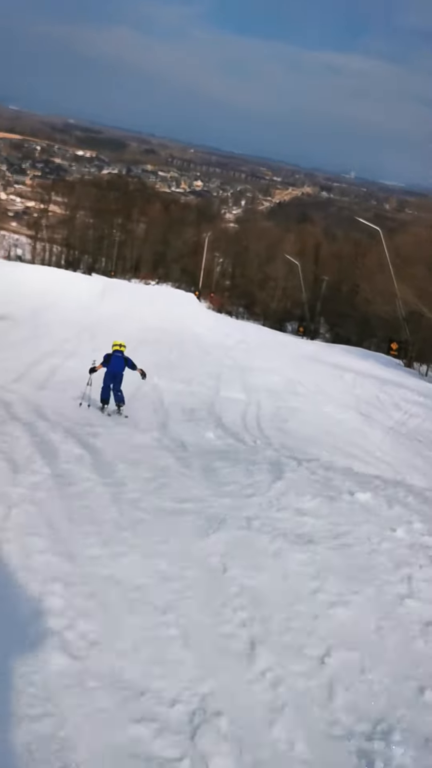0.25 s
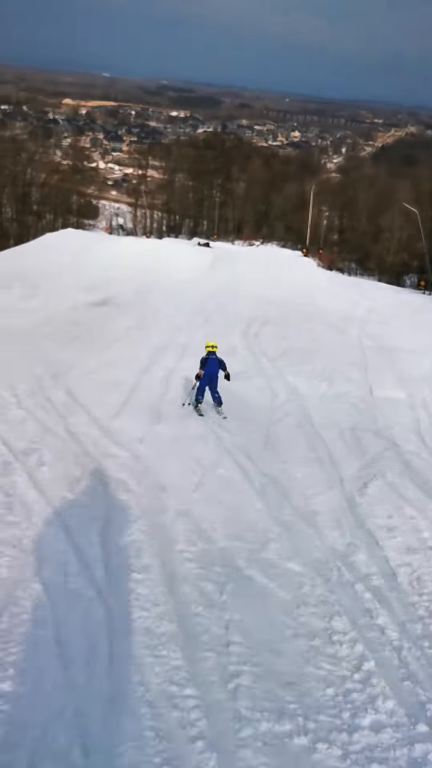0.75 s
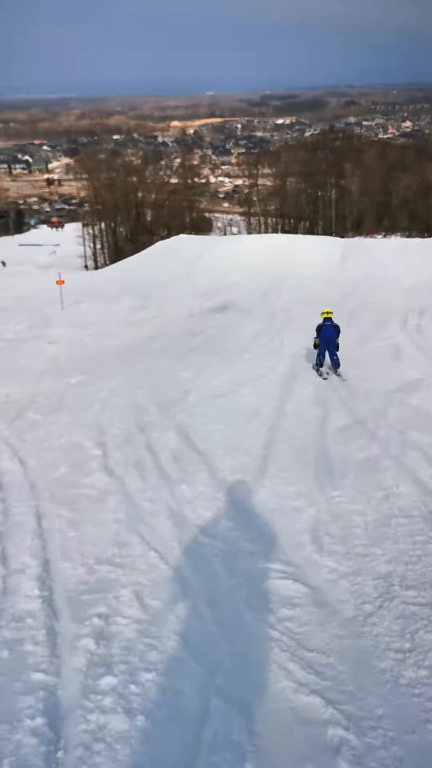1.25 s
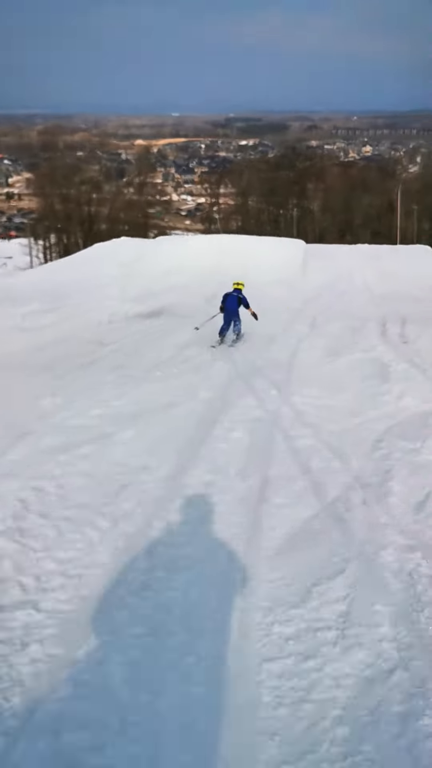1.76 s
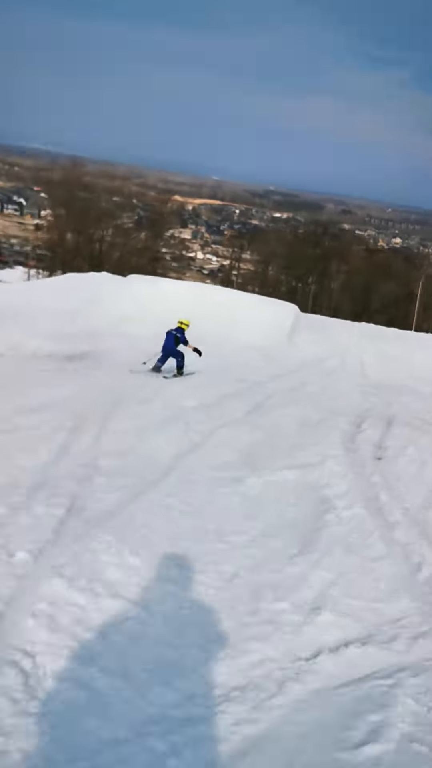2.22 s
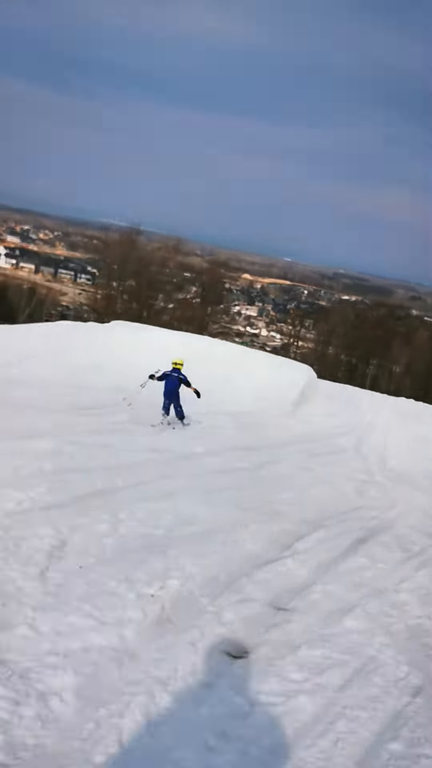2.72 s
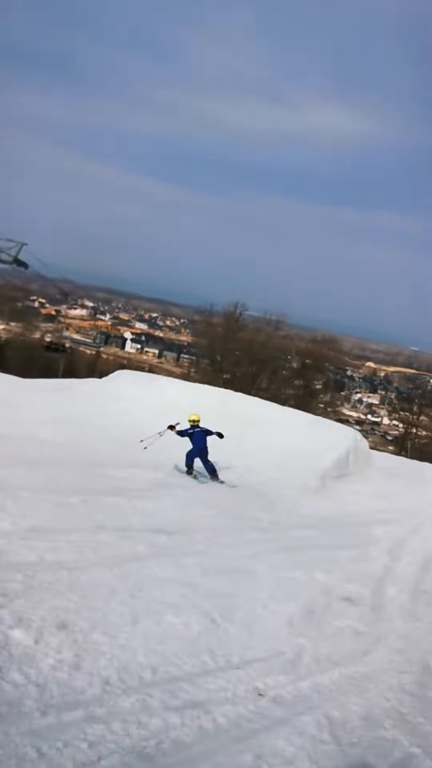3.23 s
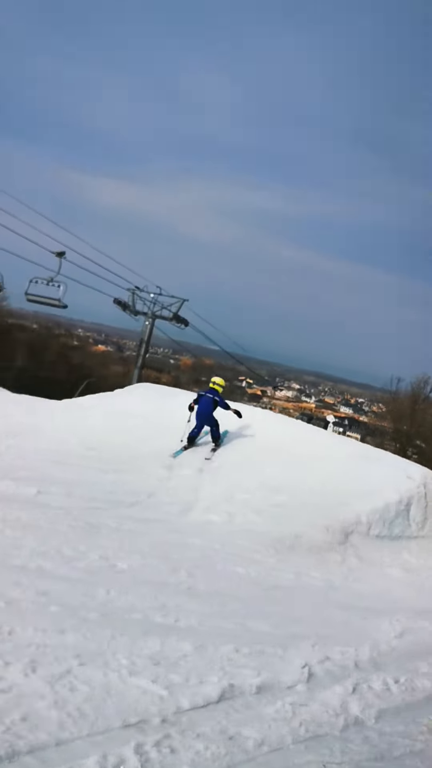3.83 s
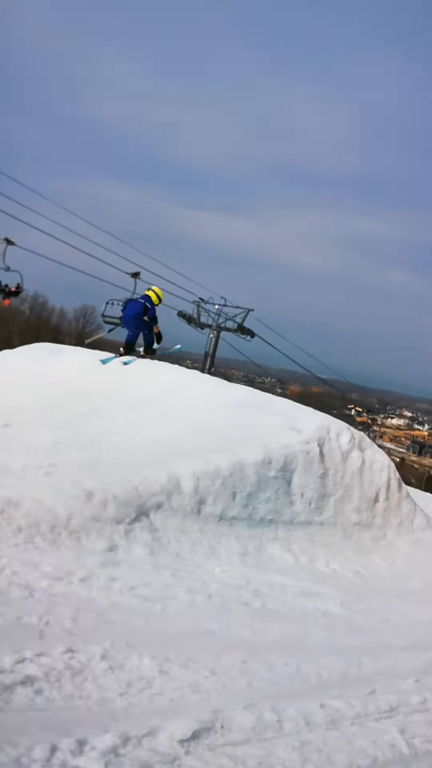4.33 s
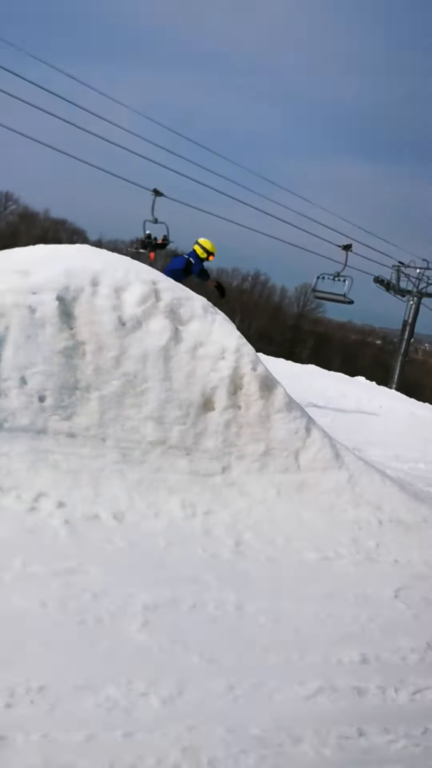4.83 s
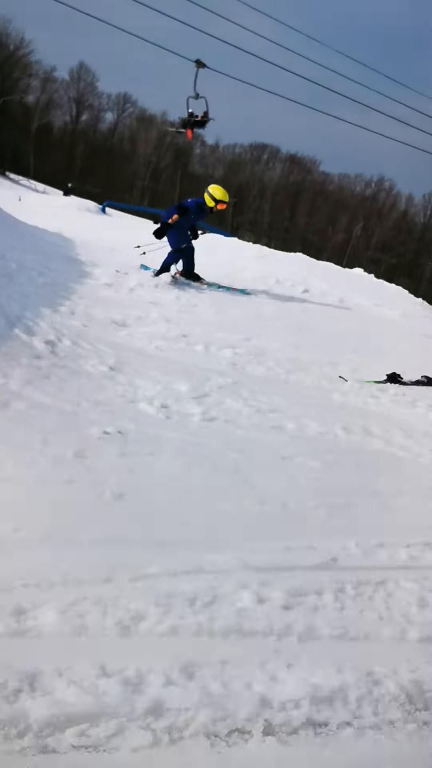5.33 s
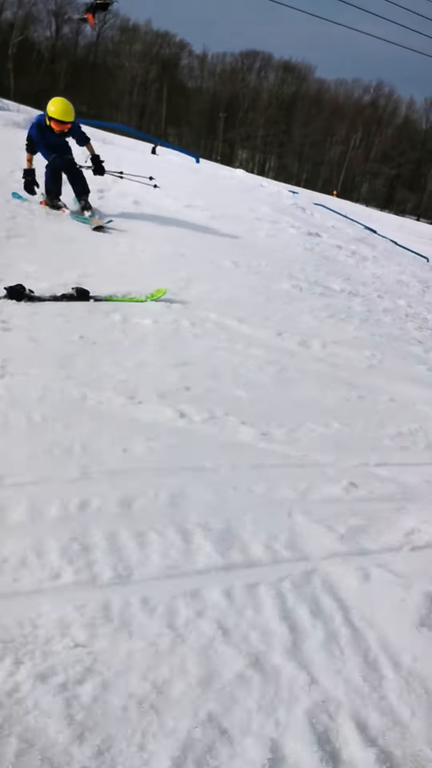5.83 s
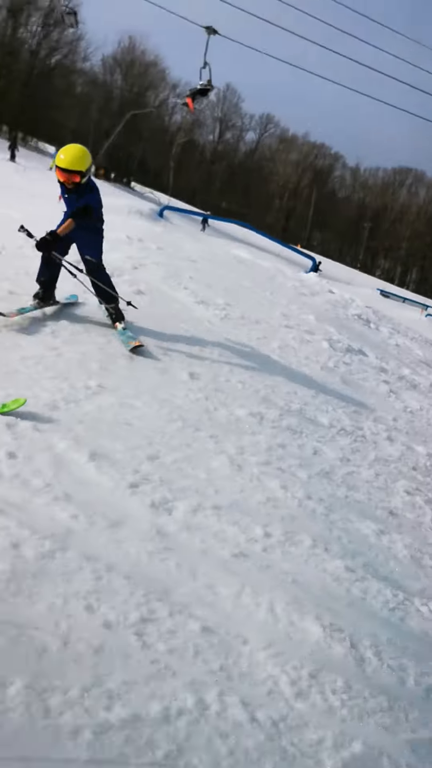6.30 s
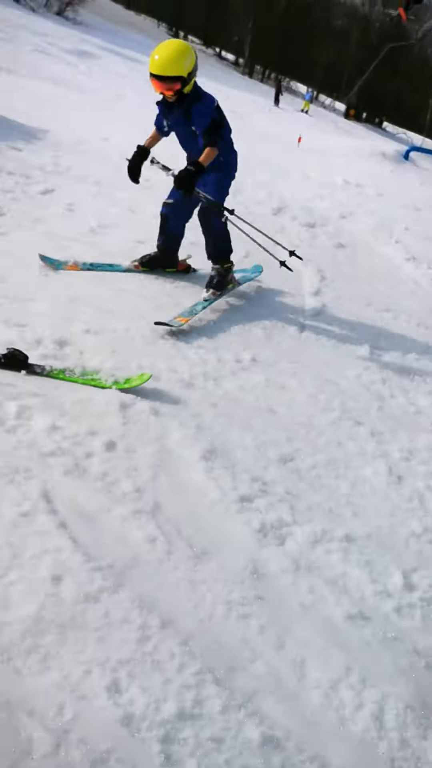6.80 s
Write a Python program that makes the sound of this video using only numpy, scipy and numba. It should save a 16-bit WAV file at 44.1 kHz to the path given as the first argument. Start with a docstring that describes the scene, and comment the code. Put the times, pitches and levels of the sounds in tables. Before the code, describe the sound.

Outdoors on a ski slope, a handheld microphone moves downhill. From 0 s, skis hiss and scrape over crusty snow, with gritty crunches and small ringing knocks, brightest toward the right, while a low puff of wind opens the scene. Around 0.7 s there is a short knock and the spray thins. From about 1 s wind buffets harder, rumbling and fluttering differently on each side, with blunt thumps; the right is more exposed. Between 1.5 and 4.5 s the ski hiss swells and dips beneath rolling gusts. From 4.6 to 5.8 s the wind turns roughest, with rapid heavy slaps close to overload. It then falls away, exposing coarse scraping and lower crunching. A braking skid swells near 6.5 s with a sharp knock, stops abruptly by 6.8 s, and leaves faint hiss and tiny low bumps until about 7 s.

```python
"""A phone is carried downhill on skis. From the start edges scrape, snow sprays and crust crunches below: shaped
noise with ringing knocks, nearer the right port. Wind buffets each microphone port on its own: noise through
moving low-passes, brighter in faster gusts; from about 1 s single eddies also land as damped blows.
The blows end before 6 s and the wind dies away; a braking skid swells near 6.6 s, then the skis fade too."""
import sys
import numpy as np
from scipy import signal
from scipy.fft import rfft, irfft, next_fast_len
from scipy.io import wavfile
from scipy.ndimage import uniform_filter1d
from numba import njit

SR = 44100
rng = np.random.default_rng(int(sys.argv[2]) if len(sys.argv) > 2 else 0)


def store_pcm(level_fs):
    """Save levels as 16-bit WAV."""
    pcm = np.round(np.clip(level_fs, -1, 1) * 32767).astype(np.int16)
    wavfile.write(sys.argv[1], SR, np.atleast_2d(pcm).T)


N = 311346

# Skis, before port gains: (time [s], edge scrape [dB], snow spray [dB])
SKI_LEVELS = [(0, -37.5, -29.5), (.3, -40, -32), (.55, -36.5, -30), (1.1, -46.5, -35.5), (1.65, -35.5, -28),
              (2.15, -37, -29), (2.45, -39, -31.5), (2.9, -43, -30), (3.1, -35.5, -29), (3.7, -35.5, -28.5),
              (4.25, -39, -31), (4.52, -38, -27.5), (4.95, -40.5, -32), (5.1, -46.5, -32),
              (5.42, -42.5, -32), (5.62, -31.5, -30.5), (5.78, -36, -28.5), (5.95, -33.5, -28),
              (6.12, -34.5, -28), (6.38, -30.5, -27.5), (6.66, -29.5, -30.5), (6.72, -44.5, -32),
              (6.8, -53, -39), (6.9, -50, -40.5), (6.97, -49, -39.5), (7.06, -52, -49)]
# Scrape spectrum, relative: (frequency [Hz], density [dB per Hz])
SCRAPE_SPECTRUM = [(150, -4), (450, 0), (900, 2), (1800, -6.5), (3500, -7.5), (5000, 1.5), (8500, -4),
                   (10000, -8), (15000, -6.5)]
# Spray spectrum, relative: (frequency [Hz], density [dB per Hz])
SPRAY_SPECTRUM = [(1000, -33), (3000, -23), (6500, -9), (10000, -5), (13000, 4.5), (15500, -1.35)]
# Scrape noise common to both ports and each port's own: (frequency [Hz], gain [dB])
SHARED_SCRAPE_EQ = [(500, -0.5), (1200, 2.5), (3000, 1.0), (5000, -9.0), (9000, -29)]
OWN_SCRAPE_EQ = [(500, -10.5), (1200, -5.5), (3000, 4.5), (5000, -5.0), (9000, 1.8)]
# Crusty snow crunching under the edges: (time [s], level [dB], centre before wander [Hz])
CRUNCH_BURSTS = [(0, -48, 2330), (.24, -45, 2300), (.33, -53, 2400), (.4, -43, 2280), (.56, -43, 2230),
                 (.62, -55, 2200), (.72, -82, 2250), (1.1, -59, 2280), (1.6, -45, 2280), (2.1, -46, 2250),
                 (2.3, -61, 2230), (3.2, -50, 2240), (4.5, -53, 2130), (5.3, -58, 2700), (5.52, -45, 2800),
                 (5.68, -44, 2750), (5.78, -60, 2400), (5.9, -49, 1500), (5.98, -46, 1100),
                 (6.08, -44, 1100), (6.16, -49, 1300), (6.27, -43, 1050), (6.36, -47, 900),
                 (6.45, -42, 800), (6.51, -49, 900), (6.56, -44, 1100), (6.65, -41, 850), (6.72, -56, 800),
                 (6.92, -58, 700), (7.06, -51, 895)]
# Left port response to the skis: (frequency [Hz], gain [dB])
LEFT_PORT_EQ = [(300, -2.5), (5000, -0.5), (9000, 0), (10500, -3), (14300, -2.5), (15000, -7), (15700, -6)]
# Right port cavity modes: (frequency [Hz], width [Hz], gain [dB])
RIGHT_PORT_MODES = [(5510, 1000, 4.5), (6890, 630, 8.5), (9450, 1540, 4), (10770, 1150, 8),
                    (13300, 1100, -0.5), (15040, 1240, 9.5)]
# Right port broad response to the skis: (frequency [Hz], gain [dB])
RIGHT_PORT_EQ = [(600, 1), (1000, -3.5), (2200, 5), (3200, 1.5), (5000, 2.5), (7000, 1.5), (8000, -1),
                 (9500, -0.16)]
# Wind at the sheltered left port, before gusts: (time [s], level [dB], air speed [m/s])
LEFT_WIND_FLOW = [(0, -12.5, 4.3), (.12, -26.5, 1.05), (.65, -33, 1.6), (.85, -23.5, 1.5),
                  (1.5, -27.5, 2.6), (1.87, -20, 4.5), (2.25, -25, 2.1), (2.4, -14.5, 4), (2.62, -26, 3),
                  (3.08, -24.5, 3.2), (3.22, -19.5, 5), (3.7, -21.5, 4.4), (3.97, -18, 5.1),
                  (4.62, -24.5, 3.6), (4.92, -16, 5), (5.28, -17, 5.5), (5.42, -19, 3.6), (5.64, -17, 3),
                  (5.76, -38, 1.2), (6.4, -48, .55), (6.65, -56, .8), (6.94, -56, 1), (6.96, -44, 5.4),
                  (7.06, -43, 4)]
# Wind at the exposed right port, before gusts: (time [s], level [dB], air speed [m/s])
RIGHT_WIND_FLOW = [(0, -18.5, 5.4), (.5, -19, 6), (.63, -20, 7), (.76, -20.5, 6.3), (.92, -16.5, 9),
                   (1.2, -11, 10.2), (1.5, -14.5, 8.9), (2.3, -11, 8.3), (2.4, -12.5, 7.9),
                   (2.6, -10, 10.6), (3.1, -11, 8.8), (3.7, -12.5, 8.2), (4.12, -13.5, 7.9),
                   (4.5, -15.5, 9.2), (4.63, -12, 14.2), (4.82, -14, 6.5), (4.9, -12.5, 11.5),
                   (4.98, -13.5, 10.5), (5.06, -15.5, 5), (5.27, -16, 4.3), (5.4, -20, 4.1),
                   (5.7, -18.5, 4.1), (5.95, -23, 3.9), (6.1, -27, 1.6), (6.31, -21, 2), (6.37, -38, 1.3),
                   (6.43, -33, 1.6), (6.55, -38, 1.3), (6.62, -55, 1), (6.93, -60, 1.6), (6.96, -46, 6.4),
                   (7.06, -50, 4)]
# Air flow: (time [s], flutter depth before scaling [dB], largest-eddy share [dB],
#            commonest eddy pitch [Hz], its share [dB])
FLOW_CHARACTER = [(0, 2.5, -4, 200, 0), (.55, 2.5, -13, 173, 3), (.68, 1.5, -14, 170, 10),
                  (.8, 0.5, -17, 210, 9), (1.0, 1.6, -14, 328, 6), (1.25, 2.3, -1, 386, 6),
                  (1.5, 2, 2, 350, 0), (1.9, 1.3, 4, 300, 2), (2.5, 1.8, 7, 259, 2), (3.5, 2.5, 3, 250, 2),
                  (4.4, 2, 8.5, 200, 0), (4.7, 3, 8, 150, 2), (5.0, 3.5, 10, 129, 3.5),
                  (5.5, 4, -2, 151, 1), (6.2, 3.5, 9.5, 100, 1.5), (7.06, 9, 5, 100, -2)]
# Eddy noise at each port: (frequency [Hz], gain [dB])
LEFT_EDDY_EQ = [(15, -15), (30, 7.0), (100, 4.0), (300, 1), (1000, -2), (2300, -7.5), (4000, -26)]
RIGHT_EDDY_EQ = [(15, -12.5), (40, -6.5), (120, -1.5), (300, -4.5), (750, -6.0), (1100, -12.0),
                 (2300, -12), (4000, -15.0)]
# Skis knocking on hard lumps of crust: (time [s], starting level [dB], pitch [Hz], decay [cycles])
CRUST_KNOCKS = [(.031, -29, 2360, 9.8), (.383, -35, 2260, 9), (.433, -33, 2250, 16), (.464, -32, 2230, 13),
                (.52, -31, 2250, 7), (.564, -29, 2250, 5), (0.668, -19, 2380, 1.5), (.692, -33, 2130, 2.5),
                (1.529, -35, 2390, 12), (1.619, -32, 2280, 12), (1.691, -28, 2100, 8),
                (1.727, -30, 2430, 6), (1.987, -35, 2170, 12), (5.474, -34, 2570, 5),
                (5.526, -24, 2780, 13), (5.66, -33, 2750, 12), (5.914, -32, 2280, 7), (6.078, -27, 4180, 5),
                (6.146, -29, 2470, 14), (6.27, -33, 1900, 8), (6.345, -28, 1480, 9.2), (6.43, -29, 1690, 8),
                (6.548, -20, 1690, 4), (6.955, -30, 205, 1.2), (7.017, -30, 186, 1.2)]
# Sudden gusts and lulls: (time [s], port [0 left, 1 right], strength before scaling [dB], length [s])
GUST_EVENTS = [(0.135, 1, 15, 0.0063), (0.415, 0, 14, .03), (0.544, 0, 10, 0.059), (0.953, 0, 21.5, 0.026),
               (1.185, 0, 13, 0.028), (1.268, 0, 12, 0.027), (0.968, 1, 7, .008), (0.905, 1, 6, .01),
               (1.03, 1, 6, .03), (1.084, 1, 8, 0.006), (1.165, 1, 5.5, .01), (1.197, 1, 6, 0.008),
               (1.222, 1, 10, .005), (1.243, 1, 12, .006), (1.316, 1, 21, 0.011), (1.334, 1, 9, 0.0045),
               (1.351, 1, 10, .004), (1.435, 1, 4, .005), (1.658, 1, 11, 0.0092), (1.882, 1, 8, 0.005),
               (1.94, 1, 6, 0.011), (2.5, 1, 6, 0.0057), (1.35, 0, 16, 0.012), (1.412, 0, 21, 0.035),
               (1.668, 0, 14, 0.024), (1.825, 0, 15, .016), (1.885, 0, 23, 0.013), (1.935, 0, 23, 0.018),
               (2.154, 0, 18, 0.019), (2.37, 0, 17, .035), (2.666, 1, 14, 0.029), (2.715, 1, 6, .015),
               (2.778, 1, 13, 0.014), (2.8, 1, 8, .01), (2.86, 1, 5, .03), (3.05, 1, 6, .02),
               (3.061, 0, 27, 0.029), (3.166, 1, 9.5, 0.044), (3.339, 1, 6.5, 0.0064), (3.394, 1, 6, .01),
               (3.6, 1, 8, 0.0087), (3.646, 1, 9, .008), (3.412, 0, 19, 0.021), (3.566, 0, 9, 0.016),
               (3.773, 1, 14.5, 0.0085), (3.878, 0, 11, 0.063), (4.1, 1, 7, .008), (4.221, 1, 15, 0.0057),
               (4.353, 0, 13, 0.028), (4.542, 1, 7, .006), (4.58, 1, 6, 0.018), (4.623, 1, 16, 0.01),
               (4.672, 1, 8, 0.04), (4.685, 0, 12, .011), (4.721, 1, 16, 0.01), (4.743, 1, 13, 0.013),
               (4.788, 0, 26, 0.018), (4.79, 1, 21, 0.019), (4.862, 1, 12, .008), (4.883, 1, 16, 0.033),
               (4.933, 1, 10, 0.017), (4.965, 0, 13, 0.015), (4.962, 1, 8, 0.034), (4.982, 1, 7, 0.0072),
               (5.007, 1, 20, .006), (5.032, 1, 13, 0.02), (5.078, 1, 16, 0.012), (5.125, 1, 20, .008),
               (5.193, 1, 14, 0.0085), (5.221, 1, 7, .01), (5.106, 1, 12, 0.0089), (5.144, 1, -12, 0.04),
               (5.174, 1, 17, 0.015), (5.245, 1, 20, 0.024), (5.277, 1, 16.5, 0.0078), (5.033, 0, 8, 0.02),
               (5.058, 0, 10, 0.008), (5.106, 0, 10, 0.016), (5.145, 0, -2, 0.03), (5.385, 0, 8, 0.02),
               (5.178, 0, 12, 0.01), (5.24, 0, 16, 0.028), (5.335, 0, 15, 0.028), (5.312, 1, 10, 0.008),
               (5.328, 1, 24, 0.011), (5.35, 1, 10, 0.01), (5.387, 1, -10, 0.047), (5.416, 1, 18.5, 0.017),
               (5.477, 1, 24, 0.013), (5.53, 1, 9, .01), (5.553, 1, 8, .007), (5.62, 1, 11, .03),
               (5.703, 1, 12, .01), (5.728, 1, 11, 0.014), (5.735, 0, 12, 0.016), (5.762, 1, 22, 0.011),
               (5.82, 1, -12.5, 0.069), (5.89, 1, 6.5, 0.037), (5.96, 1, 6, 0.01)]
# Skis lighten over a bump or dig in: (time [s], change of spray [dB], length [s])
SKI_LIFTS = [(.22, 2, .06), (.45, 1, .05), (.81, -13.5, 0.14), (1.68, 1, 0.078), (1.93, -1.5, 0.08),
             (2.27, -17, 0.098), (2.55, -4, 0.091), (2.78, -7.5, 0.15), (3.0, -2, .06), (3.22, -5, 0.093),
             (3.59, -3.5, 0.082), (3.87, -3.5, 0.14), (5.53, 1.5, 0.043), (5.91, 2, 0.046),
             (6.155, 1, 0.026), (6.3, -1.5, 0.038), (6.555, 5, 0.015), (6.96, 4, 0.024)]
# Single eddies hitting a membrane: (time [s], port [0 left, 1 right], level [dB], pitch [Hz])
EDDY_BLOWS = [(1.085, 1, -6, 400), (1.198, 1, -6, 450), (1.316, 1, -4, 600), (1.376, 0, -11, 110),
              (2.776, 1, -5, 500), (4.621, 1, -4, 600), (4.889, 1, -4, 500), (4.945, 1, -4, 350),
              (5.005, 1, -3, 300), (5.021, 1, -3, 150), (5.174, 0, -3, 170), (5.191, 1, -3, 250),
              (5.28, 1, -3, 250), (5.294, 0, -6, 350), (5.328, 1, -2, 350), (5.466, 1, -7, 150),
              (5.531, 1, -6, 250), (5.733, 1, -6, 200), (5.761, 1, -4, 250)]

SCRAPE_PORT_DB, SPRAY_PORT_DB = (0, 1.5), (-20, -1.5)  # left, right
LIFT_SCRAPE_SHARE = 0.71  # scrape change / spray change
PORT_LAG_SAMPLES = 22  # left port hears the skis later
SMALLEST_EDDY_M = 0.0099  # smallest that still pushes the membrane
MESH_HZ = 1900  # the mesh over the port stops finer eddies
BLOW_DECAY_CYCLES = 0.6
TOP_HZ = 15750


def undb(db):
    """dB to gain."""
    return 10 ** (np.asarray(db) / 20)


def unit(x):
    """Scale to rms 1."""
    return x / np.sqrt(np.mean(x ** 2))


def curves(table):
    """Columns of a timed table, one value a sample."""
    time_s, *columns = np.transpose(table)
    return [np.interp(np.arange(N) / SR, time_s, c) for c in columns]


def walk(rate_hz):
    """Random levels held 1 / rate_hz and slewed twice, on every 16th sample; rms 1."""
    hold = int(SR / 16 / rate_hz)
    steps = np.repeat(rng.standard_normal(N // 16 // hold + 2), hold)
    coarse = uniform_filter1d(uniform_filter1d(steps, hold), hold)
    return np.interp(np.arange(N) / 16, np.arange(len(coarse)), unit(coarse))


def colour(x, points=(), modes=()):
    """Filter by (Hz, dB) points and (Hz, width Hz, dB) resonances."""
    size = next_fast_len(N)
    hz = np.maximum(np.arange(size // 2 + 1) * SR / size, 1)
    gain_db = 0
    if points:
        gain_db = np.interp(np.log(hz), np.log([p[0] for p in points]), [p[1] for p in points])
    gain_db = gain_db + sum(top_db / (1 + (2 * (hz - f) / width) ** 2) for f, width, top_db in modes)
    return irfft(rfft(x, size) * undb(gain_db), size)[:N]


def bells(rows):
    """Sum of bell-shaped changes (s, dB, length s), in dB."""
    t, out = np.arange(N) / SR, np.zeros(N)
    for time_s, db, length_s in rows:
        first = max(int((time_s - 2 * length_s) * SR), 0)
        near = slice(first, int((time_s + 2 * length_s) * SR))
        out[near] += db * np.exp(-(1.59 * (t[near] - time_s) / length_s) ** 2)
    return out


@njit
def svf(x, hz, damping):
    """State-variable filter whose frequency moves every sample; low-pass and band-pass."""
    low, band = np.empty(len(x)), np.empty(len(x))
    band_state, low_state = 0., 0.
    for i in range(len(x)):
        g = np.tan(np.pi * hz[i] / SR)
        v = (band_state + g * (x[i] - low_state)) / (1 + g * (g + damping))
        low[i], band[i] = low_state + g * v, damping * v
        band_state, low_state = 2 * v - band_state, 2 * low[i] - low_state
    return low, band


def crystals(scatter_db):
    """Dense breaking of snow crystals: noise whose grains scatter in size."""
    size = np.minimum(rng.exponential(size=N), 5)
    return rng.standard_normal(N) * undb(scatter_db * size)


def crunch():
    """Patches of crust break in bursts that ring in one broad, wandering band."""
    level_db, centre_hz = curves(CRUNCH_BURSTS)
    centre_hz = centre_hz * undb(0.7 * walk(30))
    ring = svf(crystals(3.5), centre_hz, 0.5)[1]
    ring = svf(ring, centre_hz, 0.5)[1]
    burst_db = 2.6 * np.tanh(walk(45)) + 3.8 * walk(120)
    return unit(ring * undb(burst_db)) * undb(level_db)


def skis():
    """Scrape and spray at both ports; low scrape is shared, the spread-out treble is each port's own."""
    lift_db = bells(SKI_LIFTS)
    scrape_db, spray_db = curves(SKI_LEVELS) + np.outer([LIFT_SCRAPE_SHARE, 1], lift_db)
    judder = np.tanh(walk(32))  # edges grip and slip on uneven snow
    scrape_gain = undb(scrape_db + 2.1 * judder + 1.38 * walk(70))
    scrape_gain = scrape_gain + undb(-59.5)  # other skis far off keep a soft hiss
    spray_gain = undb(spray_db + 0.49 * judder + 1.23 * walk(40))
    shared = colour(crystals(3.03), SHARED_SCRAPE_EQ)
    hits = knocks() + crunch()
    ports = []
    for port, lag in enumerate((PORT_LAG_SAMPLES, 0)):
        own = colour(crystals(2.26), OWN_SCRAPE_EQ)
        scrape = unit(colour(np.roll(shared, lag) + own, SCRAPE_SPECTRUM))
        scrape = scrape * scrape_gain * undb(SCRAPE_PORT_DB[port])
        spray = unit(colour(crystals(1.8), SPRAY_SPECTRUM))
        spray = spray * spray_gain * undb(SPRAY_PORT_DB[port])
        ports.append(scrape + spray + np.roll(hits, lag))
    left = colour(ports[0], LEFT_PORT_EQ)
    right = colour(ports[1], RIGHT_PORT_EQ, RIGHT_PORT_MODES)
    return np.array([left, right])


def wind(level_db, speed_m_s, port, skirt_db, unrest, spectrum):
    """Eddies swept past a port: faster gusts carry the rumble higher and make it louder."""
    flutter_db, large_db, common_hz, common_db = curves(FLOW_CHARACTER)
    flutter_db = unrest * flutter_db  # this port's share
    surge_db = gusts(port) + 0.35 * flutter_db * walk(35)
    slaps_db = 1.6 * flutter_db * np.tanh(0.58 * walk(210))  # eddy after eddy slaps the membrane
    reach_hz = speed_m_s * undb(0.38 * surge_db + 0.76 * slaps_db) / SMALLEST_EDDY_M
    corner_hz = np.clip(MESH_HZ * np.tanh(reach_hz / MESH_HZ), 30, 3000)

    eddies = colour(rng.standard_normal(N), spectrum)
    eddies = eddies + (undb(large_db) - 1) * svf(eddies, np.full(N, 95.), 3.8)[0]
    eddies = eddies + (undb(common_db) - 1) * svf(eddies, common_hz, 0.82)[1]
    gentle = svf(eddies, corner_hz, 1.76)[0]
    steep = svf(gentle, 1.92 * corner_hz, 2.54)[0]
    # level is set against the running rms of the steady flow
    steady = svf(eddies, np.clip(speed_m_s / SMALLEST_EDDY_M, 30, 3000), 2.09)[0]
    strength = np.sqrt(uniform_filter1d(steady ** 2, size=SR // 3))
    fronts = undb(skirt_db + 0.75 * slaps_db) * (gentle - steep)  # sharp slap fronts reach higher
    gain = undb(level_db + 0.34 * surge_db + 0.55 * slaps_db)
    return (steep + fronts) / strength * gain + blows(port)


def knocks():
    """Each knock is a damped, slightly rough ring with a crack of noise."""
    size = 4000
    out, t = np.zeros(N + size), np.arange(size) / SR
    noises = rng.standard_normal((len(CRUST_KNOCKS), 2, size))
    for (time_s, db, hz, cycles), (crack, rough) in zip(CRUST_KNOCKS, noises):
        wobble_rad = np.cumsum(rough) * 0.11
        ring = np.sin(2 * np.pi * hz * t + wobble_rad) * np.exp(-t * hz / cycles)
        hit = ring + 0.2 * crack * np.exp(-t / 0.004)
        start = int(time_s * SR)
        out[start:start + size] += undb(db) * hit
    return out[:N]


def gusts(port):
    """Bell-shaped surges and lulls of the air at one port, in dB."""
    return bells([(s, db, length) for s, where, db, length in GUST_EVENTS if round(where) == port])


def blows(port):
    """Each blow pushes the membrane in at once and rebounds for about a cycle."""
    size = 2000
    out, t = np.zeros(N + size), np.arange(size) / SR
    for time_s, where, db, hz in EDDY_BLOWS:
        if round(where) == port:
            decay = np.exp((.25 - t * hz) / BLOW_DECAY_CYCLES)  # 1 at a quarter cycle
            start = int(time_s * SR)
            out[start:start + size] -= undb(db) * np.sin(2 * np.pi * hz * t) * decay
    return out[:N]


def scene():
    """Skis below, wind on each port."""
    left_db, left_m_s = curves(LEFT_WIND_FLOW)
    right_db, right_m_s = curves(RIGHT_WIND_FLOW)
    left = wind(left_db, left_m_s, 0, skirt_db=-16, unrest=0.8, spectrum=LEFT_EDDY_EQ)
    right = wind(right_db, right_m_s, 1, skirt_db=-14.0, unrest=1.02, spectrum=RIGHT_EDDY_EQ)
    return skis() + np.array([left, right])


def record(dry):
    """Peaks are rounded towards full scale, then a steep low-pass cuts the top."""
    rounded = dry / (1 + np.abs(dry) ** 6) ** (1 / 6)
    return signal.sosfilt(signal.ellip(14, .3, 70, TOP_HZ, fs=SR, output="sos"), rounded)


dry = scene()
out = record(dry)
store_pcm(out)
```